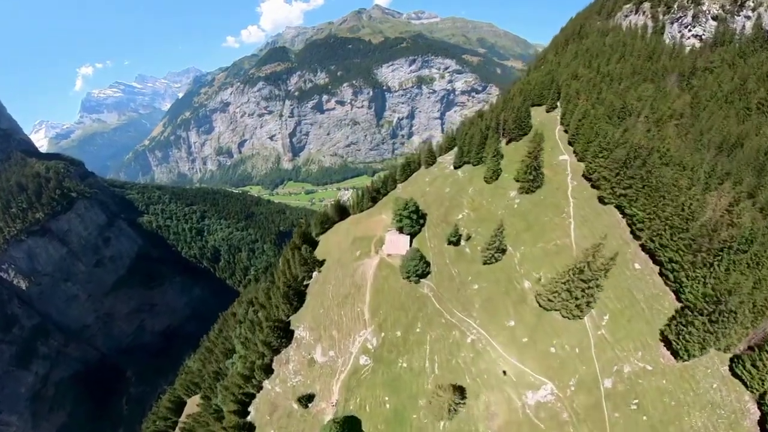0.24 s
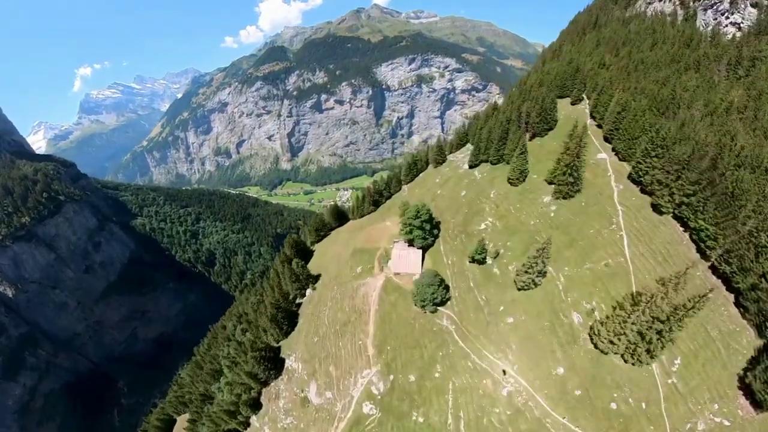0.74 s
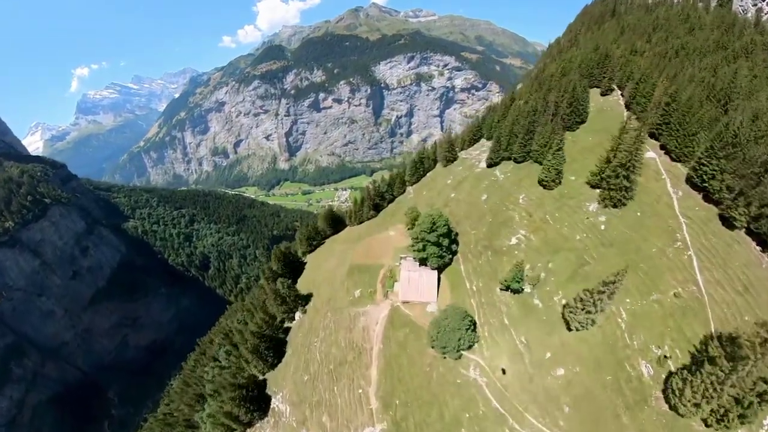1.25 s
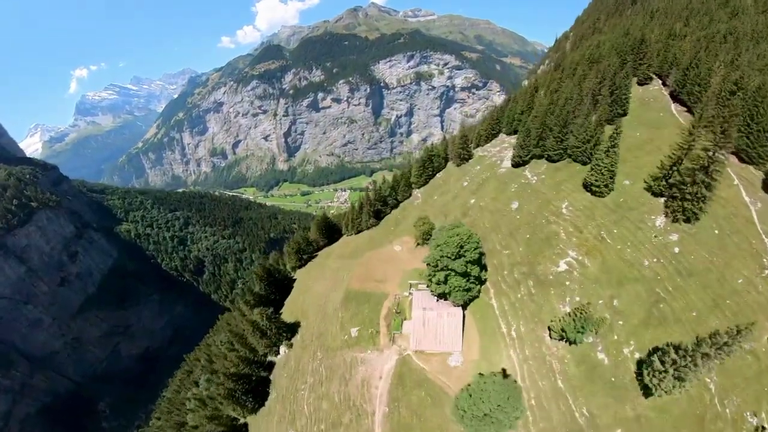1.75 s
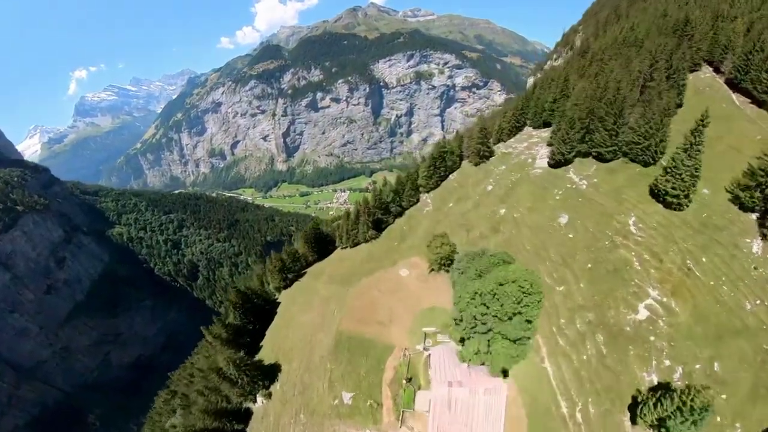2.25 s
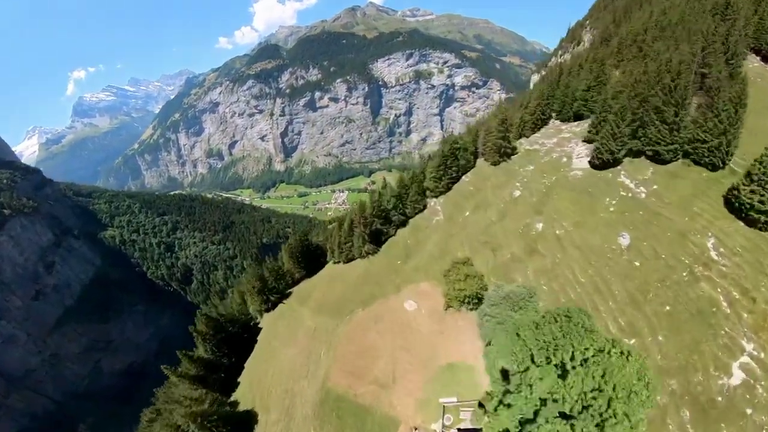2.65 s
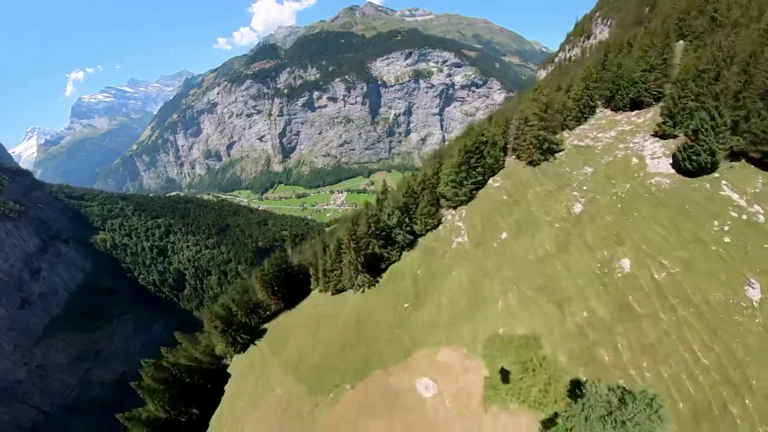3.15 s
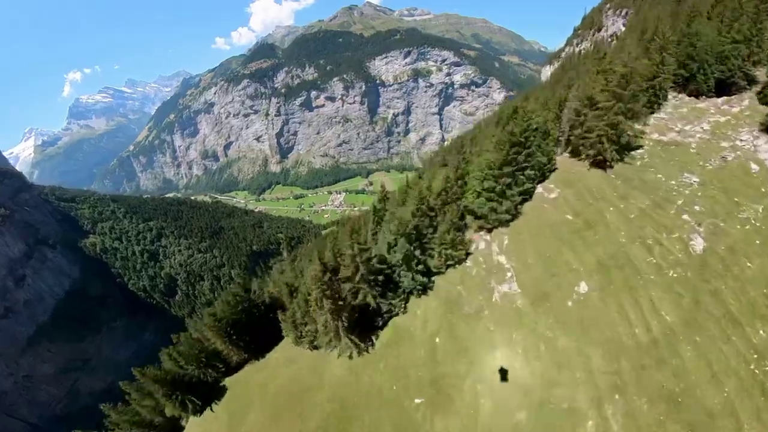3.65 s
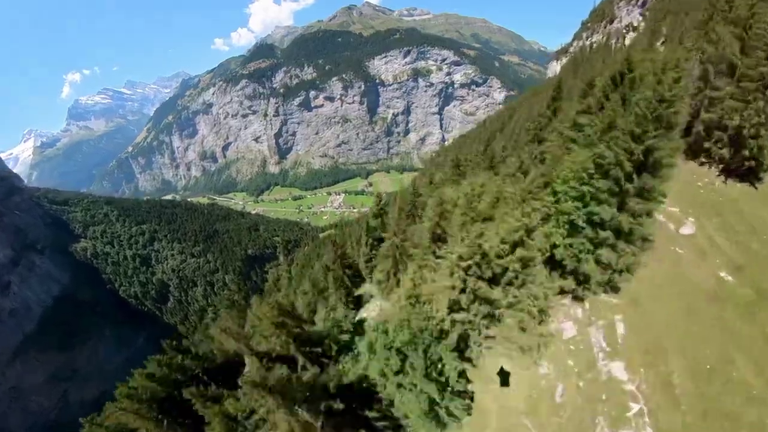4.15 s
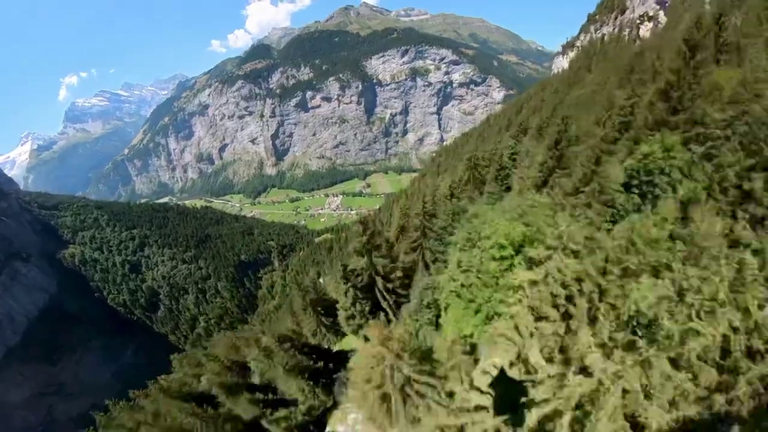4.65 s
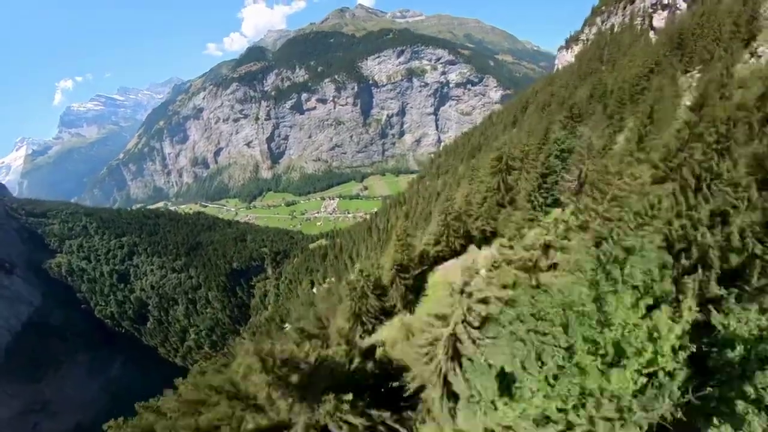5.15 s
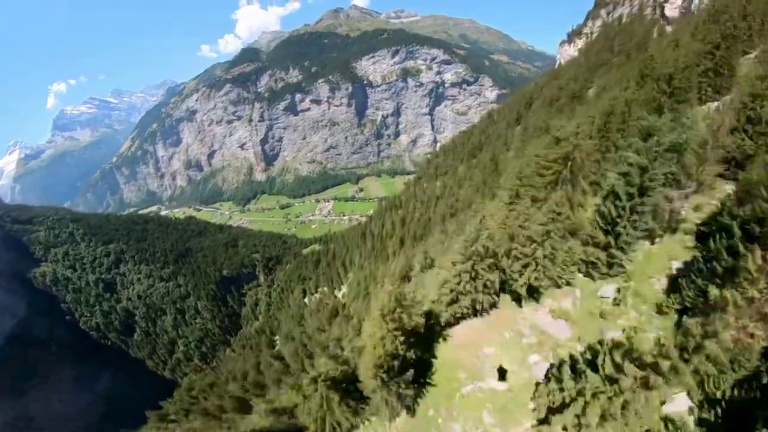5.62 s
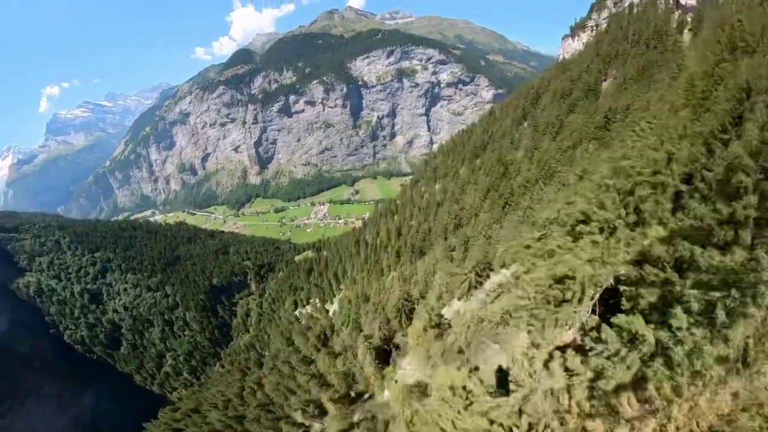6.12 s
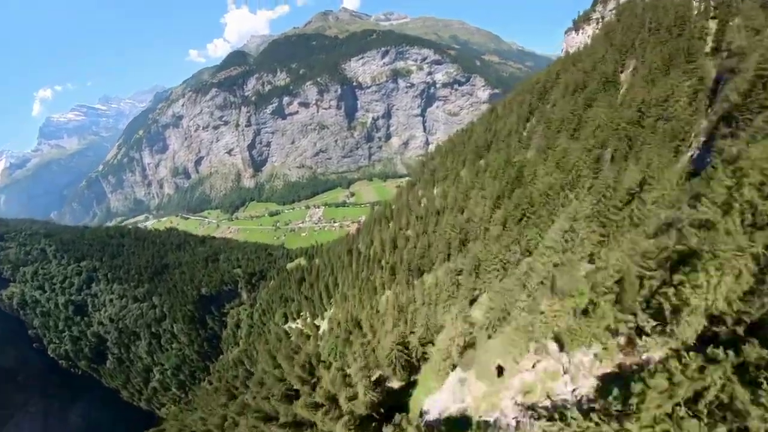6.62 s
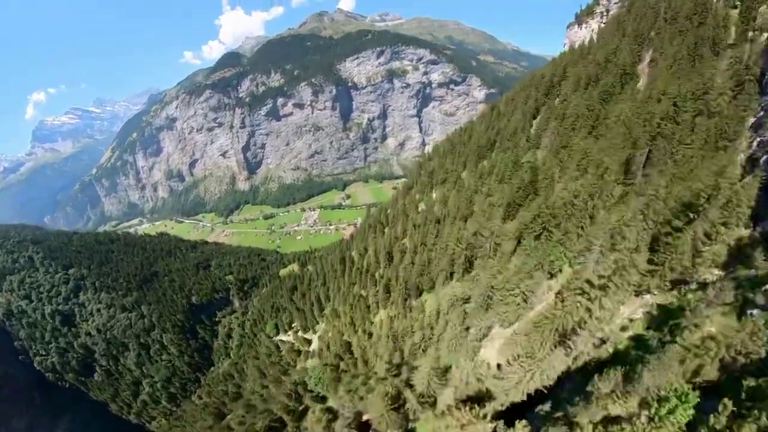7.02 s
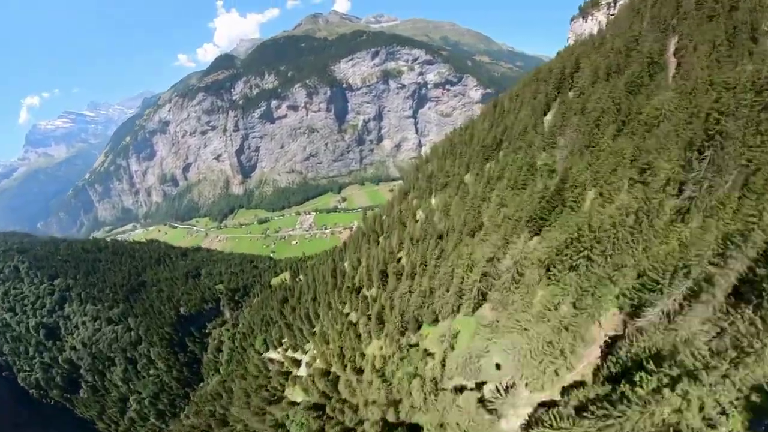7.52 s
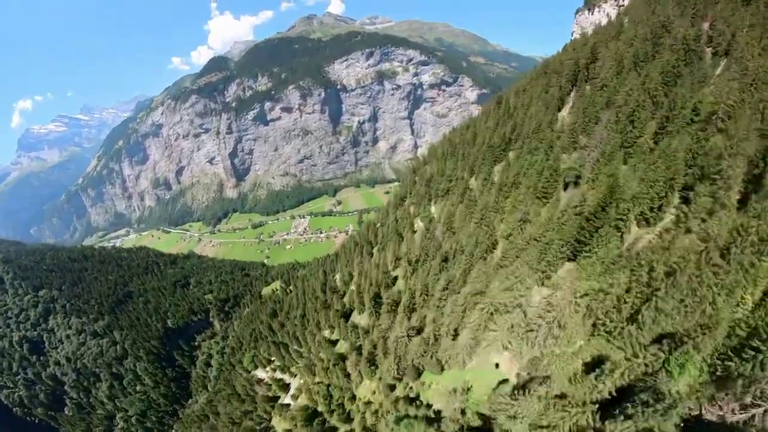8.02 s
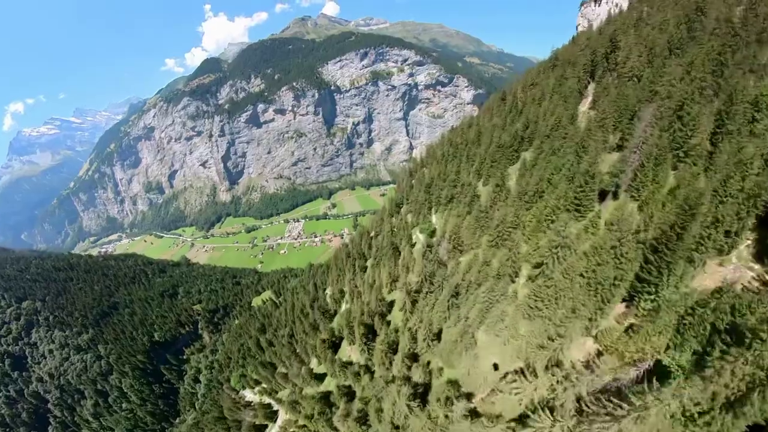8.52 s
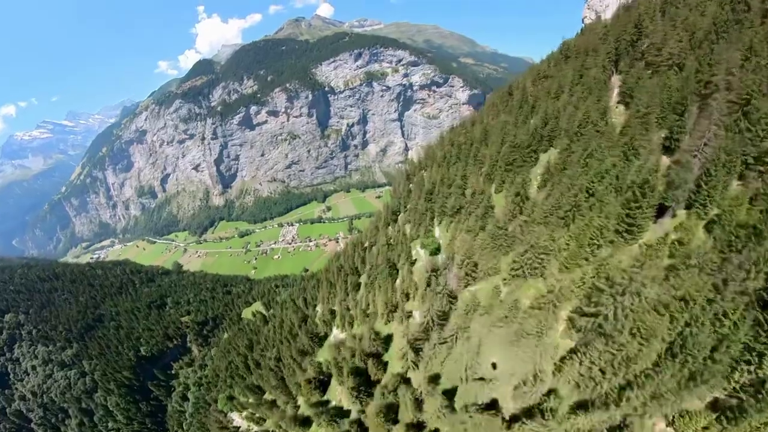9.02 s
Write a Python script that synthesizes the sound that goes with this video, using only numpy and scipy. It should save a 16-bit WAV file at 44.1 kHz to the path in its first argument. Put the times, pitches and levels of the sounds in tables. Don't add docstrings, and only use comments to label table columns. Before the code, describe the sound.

For a little over nine seconds, strong wind roars steadily over a small camera microphone flying fast above a sunny alpine slope. It begins at once, with deep thumps at about 0.1 and 0.5 seconds and a few quick cloth flicks near 0.2. After a brief thinning around 0.6, the rush strengthens, with cloth snaps near 0.8. From 1 to 5 seconds the low roar churns continuously, broken by short lulls near 1.7, 2.2 and 4.2; flutter rises slightly around 2. Heavy buffets strike near 5.3 to 5.5 and again at 6.1 to 6.3. Between 6.5 and 7.6 loose cloth flutters and snaps more often. Further thumps come at 8.1, 8.5 and 8.9 as the airy rush eases slightly, until the sound stops abruptly. A thin hiss and very faint high whine remain throughout, close, dry and mono.

```python
import sys
import numpy as np
from scipy import signal
from scipy.fft import rfft, irfft, next_fast_len
from scipy.io import wavfile
from scipy.ndimage import uniform_filter1d, minimum_filter1d

SR = 44100
rng = np.random.default_rng(int(sys.argv[2]) if len(sys.argv) > 2 else 0)


def transcribe(signal):
    frames = np.atleast_2d(signal).T
    limited = np.clip(frames, -1, 1)
    pcm = np.round(limited * 32767).astype(np.int16)
    wavfile.write(sys.argv[1], SR, pcm)


def convert_level_to_amplitude(level_db):
    exponent = np.asarray(level_db, float) / 20
    return 10 ** exponent


N = 408807

# time_s, level_db
AIR_STREAM = [(0, -65.5), (.3, -70.5), (.55, -67.5), (.72, -64), (1.3, -64), (2.1, -62.5), (2.7, -64.5),
              (3.0, -64.5), (3.4, -64.5), (3.7, -65.5), (4.65, -62), (5.2, -64.5), (5.9, -65.5), (6.5, -66),
              (7.9, -63.8), (8.36, -64), (8.48, -68), (9.27, -68)]
USUAL_STREAM_DB = -65

# pitch_hz, level_db (per Hz)
BUFFET_COLOUR = [(10, -44.5), (20, -13), (35, -8.5), (55, -1.5), (90, -1), (130, -3), (220, -21.5),
                 (400, -49)]
ROAR_COLOUR = [(50, -29), (90, -14.5), (140, -2.5), (200, -0.5), (300, -3.5), (400, -9), (600, -23.5),
               (1000, -41), (2500, -81.5)]
RUSH_COLOUR = [(170, -21), (300, -0.5), (450, -0.5), (700, -8), (1000, -14.5), (1500, -23), (2200, -37),
               (3500, -56), (5000, -64.5), (9000, -99)]
# pitch_hz, level_db (per Hz)
FLUTTER_COLOUR = [(900, -27.5), (1500, -2), (2000, -1), (2600, -6), (3300, -14), (4000, -23.5),
                  (4600, -37.5), (6000, -67)]
# pitch_hz, level_db (per Hz)
PORT_COLOUR = [(4300, -37.5), (5000, -19.5), (5600, -10.5), (6180, -1.5), (6780, 2), (7560, -0.5),
               (8100, -6.5), (8510, -11), (9000, -23), (9400, -33), (9800, -53.5)]

# level_db in the usual stream,
# then its change per dB of stream, of gust, of thump and of wake (all dB per dB)
BUFFET_RESPONSE = (-28.5, -0.26, 0.2, 1.13, 1.0)
ROAR_RESPONSE = (-24.5, 0.18, 0.04, 0.07, -.1)
RUSH_RESPONSE = (-31, 0.75, 0.96, 0, -.1)
CLOTH_RESPONSE = (-56, 0.7, 0.83, 0.04, -.1)
PORT_RESPONSE = (-65, 1.0, .9, 0.06, 0.0)

# time_s, change_db
THUMPS = [(0.14, 5.3), (0.279, 2.8), (0.444, 4.5), (0.549, 8.1), (1.137, 3.2), (1.621, 2.1), (2.085, 1.6),
          (2.36, 3.8), (2.589, 1.7), (2.873, 2.6), (3.038, 6.4), (3.582, 4), (4.026, 4.6), (5.258, 5.3),
          (5.443, 7.6), (5.817, 4.2), (6.081, 4.3), (6.206, 2.1), (6.311, 4.7), (6.79, 2.6), (7.388, 2.5),
          (7.663, 4), (7.797, 1.7), (8.092, 5.7), (8.451, 5), (8.915, 4.8), (9.029, 1.7), (9.174, 3)]
# time_s, change_db
LULLS = [(0.619, -6), (1.277, -8), (1.522, -6.5), (1.701, -9), (1.821, -4), (2.22, -12.5), (2.519, -4.7),
         (2.719, -7), (2.933, -6), (3.178, -1), (3.457, -6), (3.717, -3.4), (4.22, -9), (4.485, -4),
         (5.353, -7), (6.405, -6.6), (6.984, -2), (7.463, -6), (7.862, 0.5), (7.967, -2.5)]
# time_s, change_db
GUSTS = [(0.095, 0.8), (0.299, -1), (0.464, 0.5), (0.584, -1.7), (0.778, 1.5), (1.447, -2.2), (1.527, -0.7),
         (1.721, 1.5), (2.18, 1.2), (2.814, 2.3), (2.898, -1.7), (3.073, -3.5), (3.312, 1.2), (3.507, 1.5),
         (3.602, -1.5), (4.395, -2.5), (4.664, 0.5), (5.393, 1.4), (5.567, -1.8), (6.969, 3), (7.363, -0.8),
         (7.568, 0.8), (7.972, 1.2), (8.117, -2.5), (8.316, 1), (8.486, -1), (8.83, 1), (9.034, -2.2)]
# time_s, change_db
WAKE = [(0, -1), (.6, 0.5), (1.0, 0), (1.6, -1), (2.4, .5), (3.9, 0), (4.4, 1), (5.0, 0), (5.5, 1.5),
        (6.4, -.5), (7.6, 1), (8.0, 0.5), (8.5, 2), (9.27, 0.5)]
# time_s, change_db
SURGES = [(0.135, 2.0), (1.048, 2.4), (1.262, 2.1), (1.527, 1.4), (1.806, 2.5), (2.255, 3.8), (2.464, 1.5),
          (2.619, 1.4), (3.048, 1.7), (3.432, 1.0), (3.986, 1.2), (4.325, 1.5), (4.53, 1.8), (4.679, 1.5),
          (4.939, 2.5), (5.532, 1.1), (6.086, 1.4), (6.465, 2.3), (7.249, 2.8), (7.987, 2.2), (8.246, 1.2),
          (8.391, 1.8), (8.93, 1.5), (9.089, 1.2)]
# time_s, change_db
SLACKS = [(.3, 0), (.5, -3), (.62, -4), (.7, -5), (2.35, -2.5), (3.6, -2.5), (5.35, -2), (5.47, -2),
          (5.69, -5), (6.0, -2.5), (6.15, -5), (6.39, -0.5), (6.92, -5), (7.7, -4.5), (8.5, -2),
          (8.86, -1.5), (9.02, 0), (9.2, -3)]
# time_s, change_db
SWEEPS = [(.45, -1.5), (1.45, -1.5), (1.74, 1), (2.94, -1), (3.95, 2), (4.26, 1.5), (4.35, -2.5), (4.9, 2),
          (5.35, 1.5), (5.5, -1), (5.9, -1.5), (6.3, 1), (6.45, 1), (6.75, -2), (7.3, 0.5), (7.72, 0),
          (8.5, -2), (8.62, 1), (9.2, -2.5)]
# time_s, change_db
LOOSE_CLOTH = [(0.2, 1), (0.3, -1.5), (0.78, 2), (1.95, 3), (2.25, 2.5), (4.65, 1.5), (6.55, 3), (6.72, 5),
               (6.95, 4), (7.17, 3), (7.56, 3.1), (9.2, 4)]
THUMP_S, LULL_S, GUST_S, SURGE_S, SWEEP_S, LOOSE_S = 0.028, 0.026, 0.035, 0.02, 0.04, 0.06

# pitch_hz,
# level_db (per Hz)
WHINE_COLOUR = [(15450, -26.5), (15600, -8.5), (15710, 0.5), (15770, -6.5), (15830, -24.5)]
SIZZLE_COLOUR = [(10900, -21), (11300, -5), (11600, -1.5), (11900, 1.5), (12200, -1.5), (12600, -20)]
WHINE_UNDER_STREAM_DB, SIZZLE_DB = -33.5, -103

# start_s, peak_db
FLAPS = [(0.199, -37), (0.207, -40), (0.2314, -49), (0.626, -44), (0.7731, -43), (0.81, -37), (2.72, -45),
         (5.1886, -46), (6.519, -40), (6.685, -42), (6.696, -38), (6.74, -36), (6.933, -44), (6.9505, -37),
         (6.962, -39), (7.1107, -44), (7.5694, -37), (8.332, -48), (9.11, -48)]
# pitch_hz, level_db (per Hz)
SNAP_COLOUR = [(600, -31), (1300, -1), (2200, 0.5), (3000, -8), (3700, -17.5), (4300, -29.5), (5500, -58)]
FLAP_RISE_S = 0.0024


def evened(x):
    return x / np.sqrt(np.mean(x ** 2) + 1e-20)


def control(table):
    time_s, level_db = np.transpose(table)
    return np.interp(np.arange(N) / SR, time_s, level_db)


def swells(events, width_s):
    t = np.arange(0, N / SR + 0.01, 0.002)
    time_s, change_db = np.transpose(events)
    bells = np.exp(-((t - time_s[:, None]) / width_s) ** 2 / 2)
    return np.interp(np.arange(N) / SR, t, change_db @ bells)


def lumps(lo_hz, hi_hz):
    t = np.arange(0, N / SR + 0.01, 0.001)
    rates_hz = np.geomspace(lo_hz, hi_hz, num=40)
    phases = rng.random(40)
    swell = sum(np.sin(2 * np.pi * (f * t + p)) / f ** 0.13 for f, p in zip(rates_hz, phases))
    return np.interp(np.arange(N) / SR, t, evened(swell))


def coloured(spectrum):
    length = next_fast_len(N)
    pitch_hz, level_db = np.transpose(spectrum)
    bins_hz = np.fft.rfftfreq(length, 1 / SR)
    gain_db = np.interp(np.log(bins_hz + 1), np.log(pitch_hz + 1), level_db, -150, -150)
    white = rfft(rng.standard_normal(length))
    return evened(irfft(white * convert_level_to_amplitude(gain_db), length)[:N])


def steadied(x, share, size):
    power = uniform_filter1d(uniform_filter1d(x ** 2, size), size)
    return evened(x / (power + 1e-3) ** (np.clip(share, 0, 1) / 2))


def eddies(noise, level_db, gusts_db, own_db):
    return convert_level_to_amplitude(level_db + gusts_db + own_db * lumps(4, 60)) * noise


def air_movements():
    stream = control(AIR_STREAM) - USUAL_STREAM_DB
    thumps = swells(THUMPS, THUMP_S) + swells(LULLS, LULL_S)
    return np.array([np.ones(N), stream, swells(GUSTS, GUST_S), thumps, control(WAKE)])


def buffeting(air, gusts):
    noise = steadied(coloured(BUFFET_COLOUR), 0.43, size=1500)
    return eddies(noise, np.array(BUFFET_RESPONSE) @ air, 0.39 * gusts, own_db=1.0)


def roar(air, gusts):
    noise = steadied(coloured(ROAR_COLOUR), 0.45, size=1200)
    bunching_db = swells(SURGES, SURGE_S) + swells(SLACKS, SURGE_S)
    level_db = np.array(ROAR_RESPONSE) @ air + bunching_db
    return eddies(noise, level_db, 0.26 * gusts, own_db=1.1)


def rush(air, gusts):
    noise = steadied(coloured(RUSH_COLOUR), 0.15, size=1200)
    level_db = np.array(RUSH_RESPONSE) @ air + swells(SWEEPS, SWEEP_S)
    return eddies(noise, level_db, 0.46 * gusts, own_db=0.24)


def cloth_flutter(air, gusts):
    level_db = np.array(CLOTH_RESPONSE) @ air + swells(LOOSE_CLOTH, LOOSE_S)
    return eddies(coloured(FLUTTER_COLOUR), level_db, 0.27 * gusts, own_db=0.9)


def port_hiss(air, gusts):
    return eddies(coloured(PORT_COLOUR), np.array(PORT_RESPONSE) @ air, 0.45 * gusts, own_db=0.25)


def wind():
    air = air_movements()
    gusts = lumps(5, 90)
    out = buffeting(air, gusts)
    out += roar(air, gusts)
    out += rush(air, gusts)
    out += cloth_flutter(air, gusts)
    return out + port_hiss(air, gusts)


def whine_and_sizzle():
    whine_db = control(AIR_STREAM) + WHINE_UNDER_STREAM_DB + 3.5 * lumps(2.5, 30)
    whine = convert_level_to_amplitude(whine_db) * coloured(WHINE_COLOUR)
    return whine + convert_level_to_amplitude(SIZZLE_DB) * coloured(SIZZLE_COLOUR)


def cloth_flaps():
    t = np.arange(N) / SR
    puffs = np.zeros(N)
    for start_s, peak_db in FLAPS:
        u = np.clip((t - start_s) / FLAP_RISE_S, 0, 50)
        puffs += convert_level_to_amplitude(peak_db - 9.5) * u * np.exp(1 - u)
    return puffs * coloured(SNAP_COLOUR)


def scene():
    return (wind() + whine_and_sizzle() + cloth_flaps())[None]


def band_limit(x):
    return signal.sosfilt(signal.butter(12, 15830, fs=SR, output="sos"), x)


def record(dry):
    power_db = 10 * np.log10(uniform_filter1d(dry[0] ** 2, size=1300) + 1e-12)
    over_db = uniform_filter1d(power_db + 19, size=900)
    levelled = dry[0] / convert_level_to_amplitude(0.064 * over_db)
    room = np.minimum(convert_level_to_amplitude(-9.3) / (abs(levelled) + 1e-9), 1)
    room = minimum_filter1d(room, size=801)
    limited = levelled * uniform_filter1d(uniform_filter1d(room, size=400), size=400)
    soft_ends = signal.windows.tukey(N, 160 / N)
    return band_limit((limited * soft_ends)[None])


dry = scene()
out = record(dry)
transcribe(out)
```